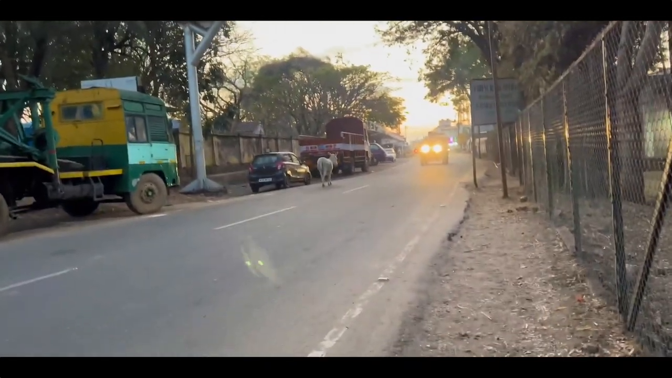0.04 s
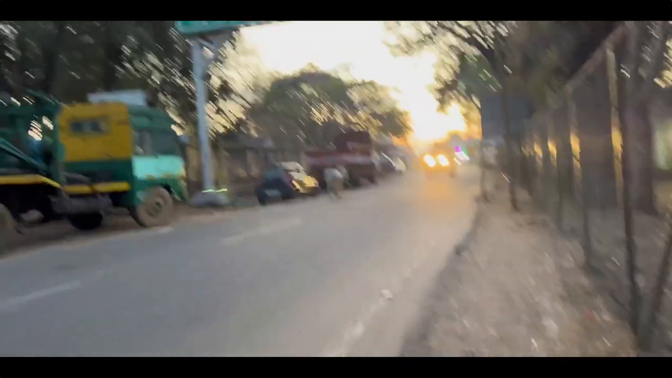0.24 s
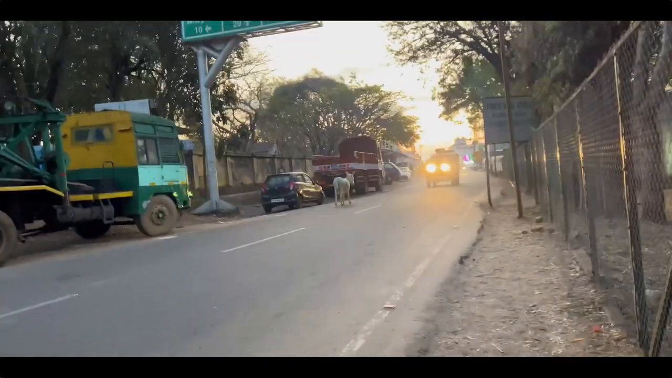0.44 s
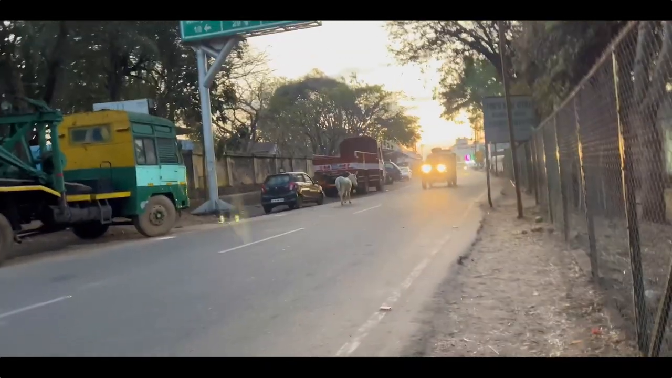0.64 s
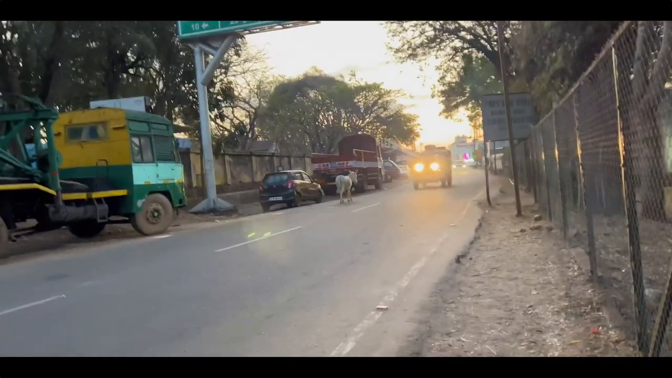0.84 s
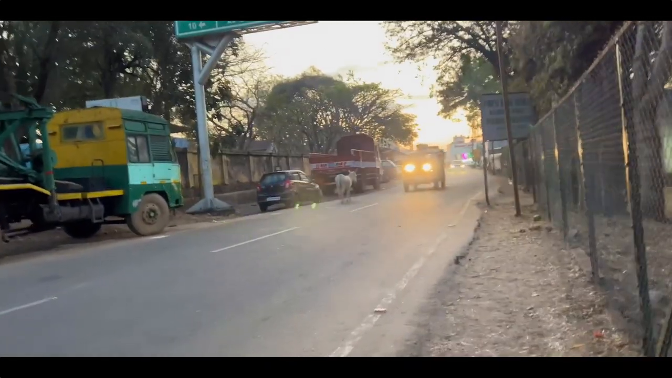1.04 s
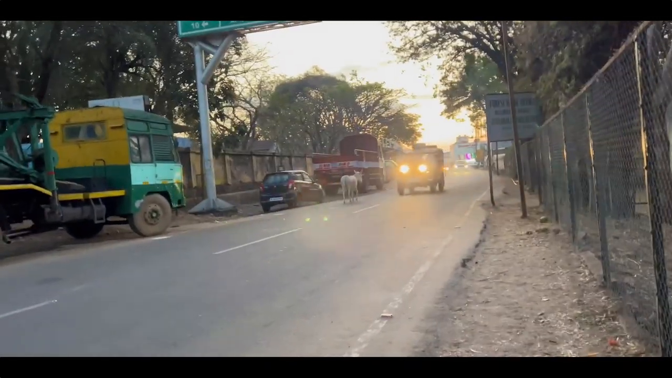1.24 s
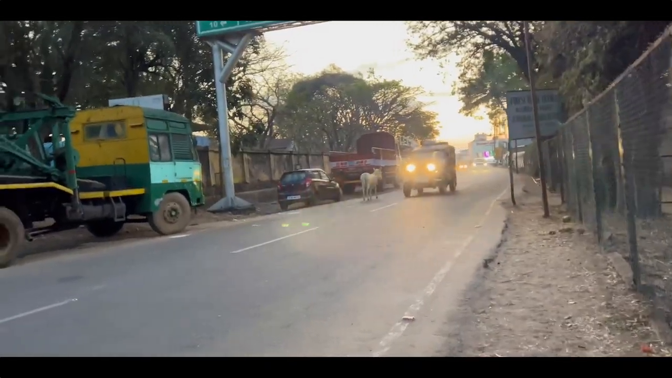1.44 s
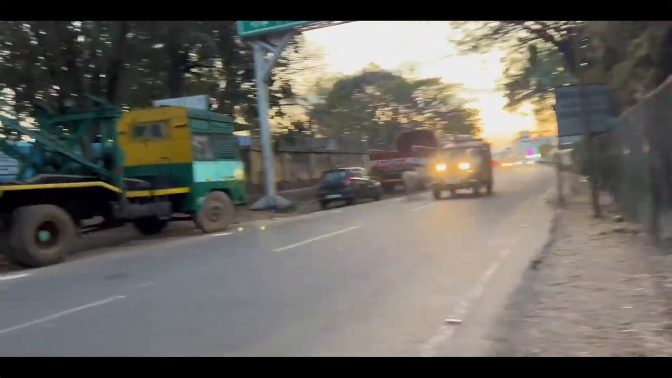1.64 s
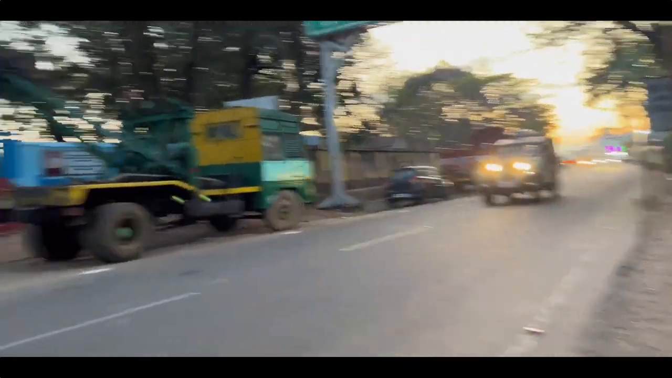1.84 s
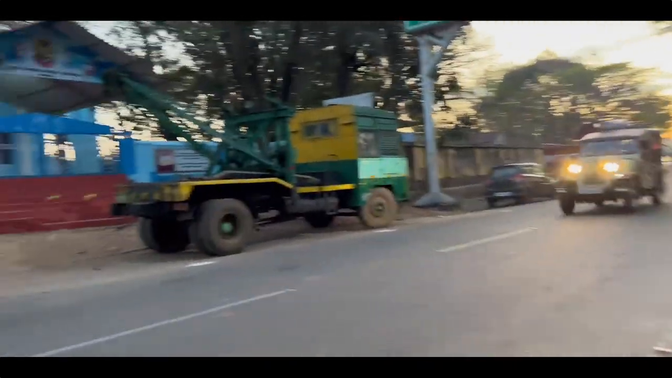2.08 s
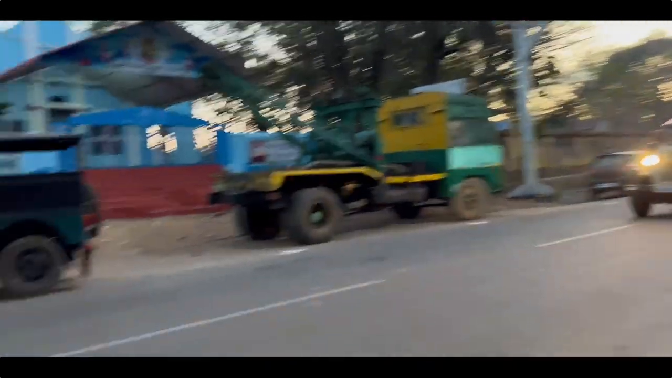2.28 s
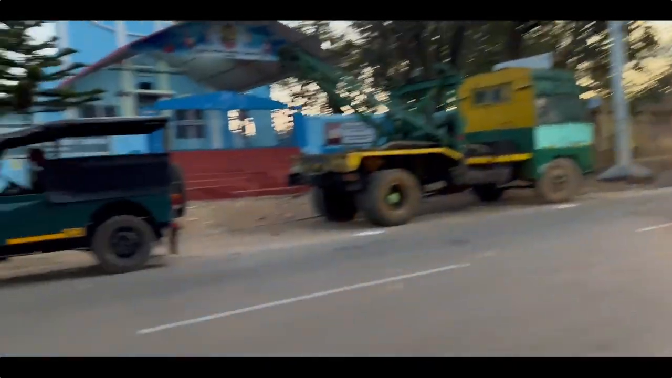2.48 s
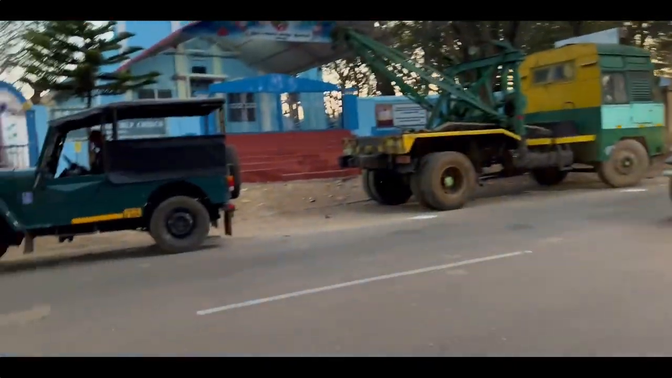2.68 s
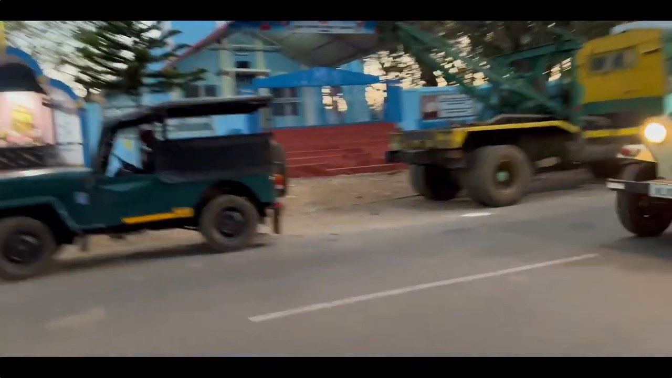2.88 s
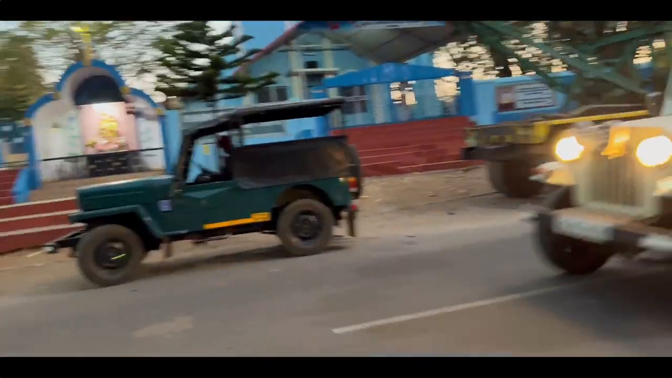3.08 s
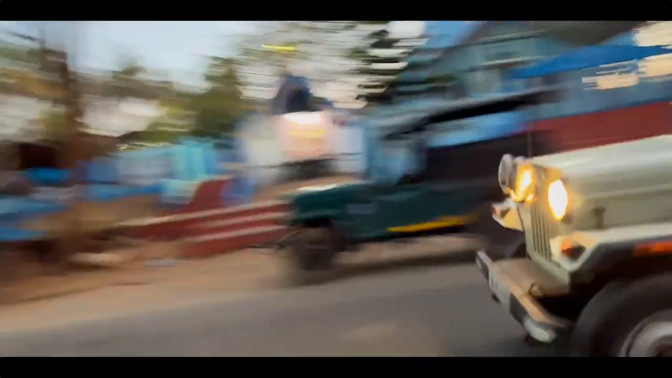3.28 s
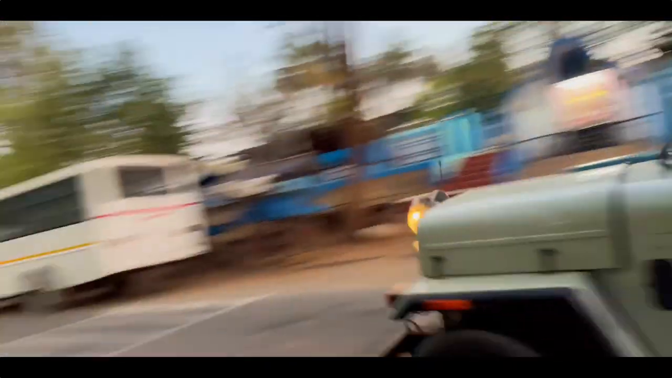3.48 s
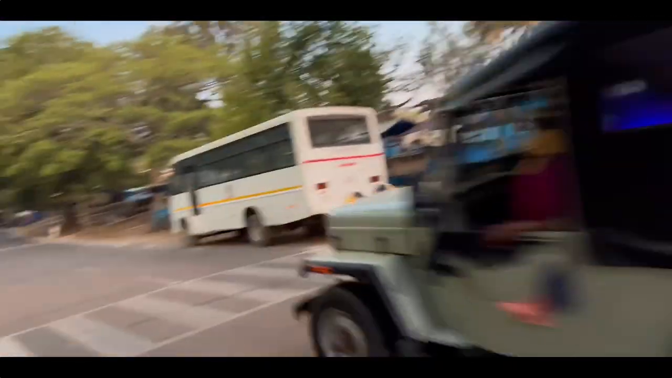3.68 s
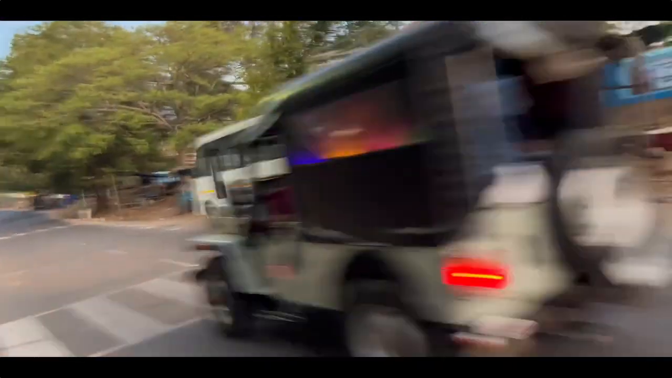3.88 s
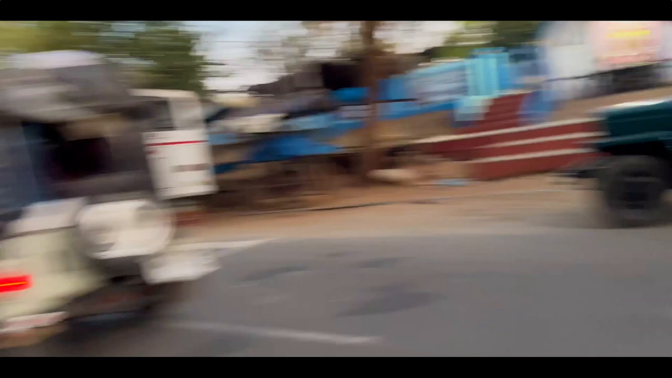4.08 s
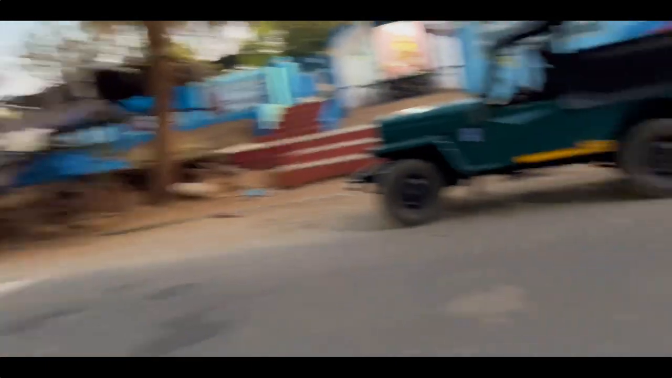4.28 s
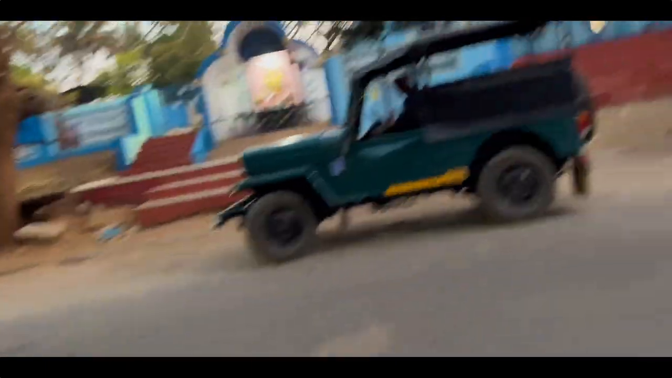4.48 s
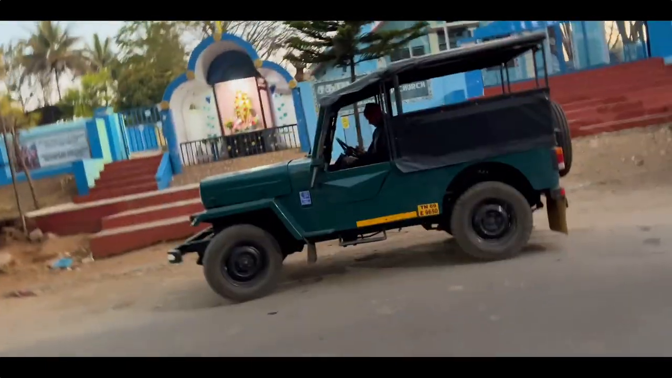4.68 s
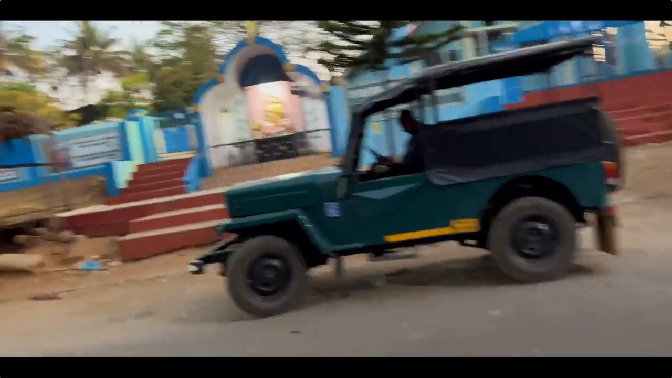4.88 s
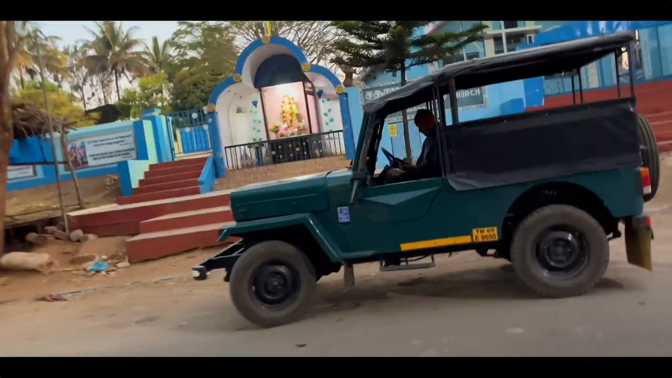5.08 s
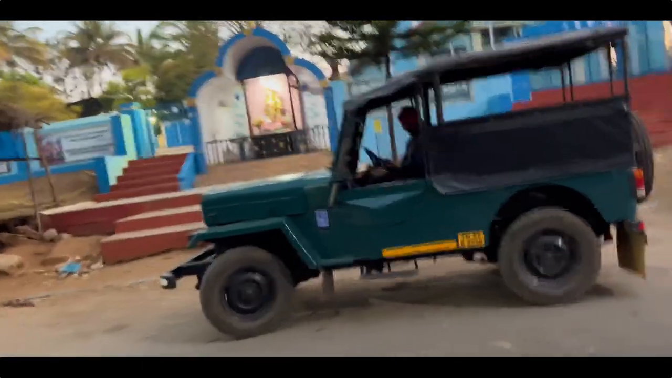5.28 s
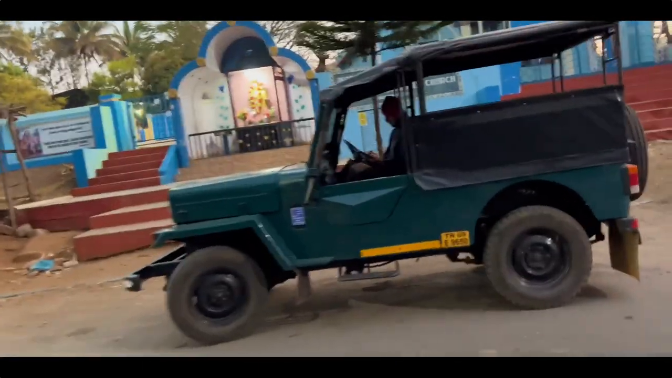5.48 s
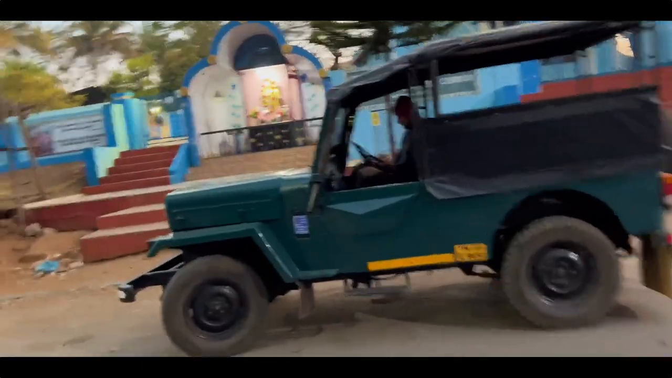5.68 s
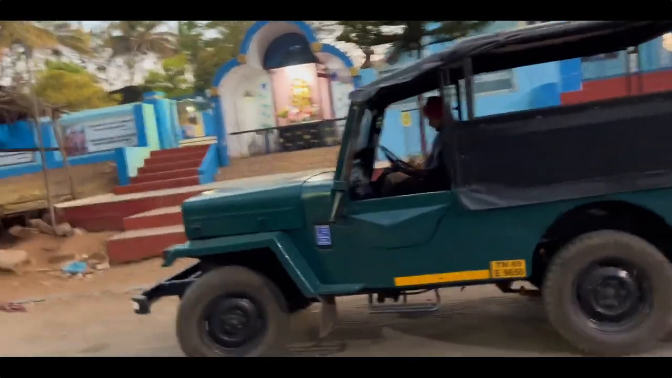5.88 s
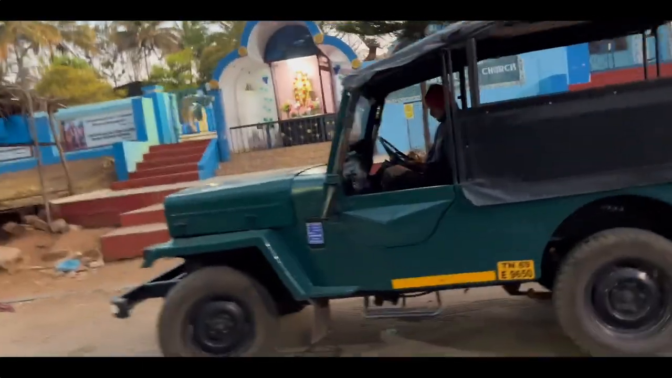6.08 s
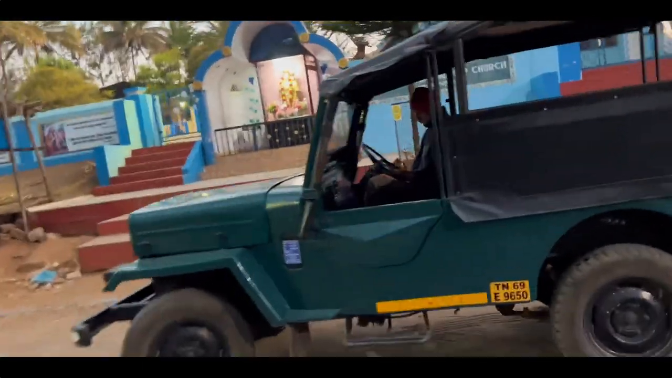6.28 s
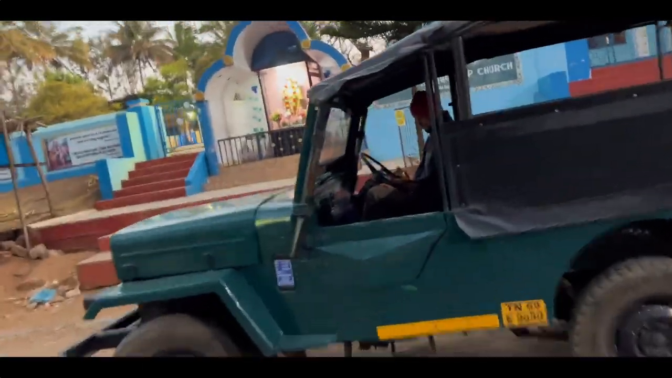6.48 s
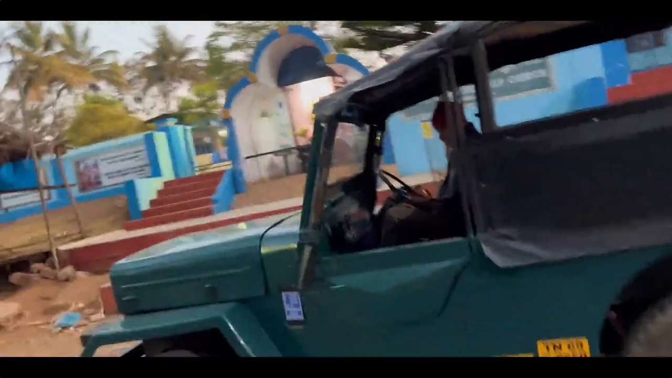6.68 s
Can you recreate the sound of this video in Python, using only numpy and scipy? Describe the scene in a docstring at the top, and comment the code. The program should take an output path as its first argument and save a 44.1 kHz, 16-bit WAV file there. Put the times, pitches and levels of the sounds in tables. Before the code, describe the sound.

Old diesel off-roader drives up, lifts off, sweeps by very near and recedes; its wake thumps the microphone, then a faint distant horn blips.

```python
"""A four-cylinder diesel off-roader comes up a village road, lifts off the throttle, passes close and drives away.
Its wake then buffets the microphone of a phone; a two-tone horn blips far down the road over a low traffic hum."""
import sys
import numpy as np
from scipy import signal
from scipy.fft import rfft, irfft, next_fast_len
from scipy.io import wavfile
from scipy.ndimage import uniform_filter1d, map_coordinates

SR = 44100
rng = np.random.default_rng(int(sys.argv[2]) if len(sys.argv) > 2 else 0)


def put_to_file(sound):
    """Save the sound as 16-bit audio at rate SR, in the file named by the first command-line argument."""
    columns = np.atleast_2d(sound).T  # one column per channel
    safe = np.clip(columns, -1, 1)
    whole_steps = np.round(safe * 32767)
    wavfile.write(sys.argv[1], SR, whole_steps.astype(np.int16))


N = 297227

BAY = [(612, 50, 2.5), (765, 62, -13), (942.7, 28, 1)]  # (Hz, width Hz, dB)
TAIL = [(2800, 260, 1), (4430, 92, -4), (5720, 370, -0.5), (7320, 250, -3)]  # (Hz, width Hz, dB)
# spectra (Hz, dB per Hz)
GROWL = [(60, -17), (130, -4), (200, -3), (300, -2), (420, -8), (600, -14), (900, -56)]
KNOCK = [(300, -4), (480, 4), (700, 4.5), (1100, -2), (1700, -2.5), (2200, -20), (3200, -86)]
CLATTER = [(1400, -20), (2000, 3), (2600, 4), (3300, -1.5), (4300, -12.5), (5200, -15), (7000, -40)]
HISS = [(3000, -17.5), (4300, -5), (5000, -8.5), (6300, -4), (7100, -6.5), (8500, -8), (10000, -13.5), (12000, -27)]
HUM = [(18, -36), (30, -2), (113, 4), (662, -6), (953, -8.5), (1200, -15), (1560, -12.5), (2190, -17), (7060, -23.5),
       (11000, -47), (15000, -84)]
ALIKE = [(300, 1), (500, 0.95), (900, 0.91), (1700, 1), (2800, 0.97), (4200, 0.82), (6000, 0.6), (10000, 0.96), (15000, 0.96)]  # (Hz, left-right likeness)
# pops of the wake: (s, peak dB, top of the spectrum Hz, length s, thump under it dB)
POPS = [(4.696, -7.5, 1800, 0.0045, -12), (4.802, -13, 590, 0.019, 4.5), (4.822, -13.5, 700, 0.016, -17), (4.839, -15, 894, 0.01, -24), (4.924, -19, 576, 0.014, -20), (4.959, -20.5, 350, 0.025, 0), (5.166, -19.5, 500, 0.0077, -1), (5.314, -17.5, 1080, 0.0043, -8), (5.342, -33, 350, 0.011, 12), (5.382, -20, 520, 0.0074, -7), (5.461, -29.5, 594, 0.015, 7), (5.84, -32, 892, 0.0042, -15), (5.869, -32, 496, 0.017, -8), (6.113, -23.5, 360, 0.009, -4)]
HORN_HZ = [441, 500]
HORN = [(-35, -42.5), (-36, -38.5), (-40, -41), (-39.5, -46.5), (-53, -51), (-51, -60), (-61, -56), (-59, -62), (-59, -63), (-56.5, -68)]  # overtones: (low horn dB, high horn dB)
STREET = [(0.048, -12), (.095, -12.5), (.13, -15), (0.191, -23)]  # house fronts: (delay s, dB)
TICK = [(5.473, -28.5, 4080)]  # a grain of grit: (s, dB, Hz)
LOWEST_LEAD = 2.6  # fixed: radians by which the bass cut of the microphone turns the first order
TOP_HZ = 15800  # fixed
SIZZLE = [(8000, -40), (10000, -5), (11200, 0), (12500, -12), (14000, -14), (15800, -25)]
GUSTY = [(50, 0.87), (150, 0.68), (400, 0.2), (1200, 0.12)]  # the same for wind on the two ports
LEAD = [(300, 0), (700, -0.0045), (1500, -0.49), (2500, 0.53), (3150, 1), (3700, 0.98), (4600, -0.69), (5400, -1.05), (7100, -1.21), (15500, -1.52)]  # (Hz, radians the left port leads)
INTAKE = [(1240, 160, -2), (1328, 42, 2), (1427, 77, -3), (1576, 81, -3.5), (1770, 170, -5), (1950, 500, -6.5)]  # intake, same columns
# exhaust note: (s, firings a second as heard Hz, level dB of orders 1, 2, 3)
NOTE = [(0, 56, -39, -35, -38), (.08, 55.2, -32.5, -27, -37.5), (.5, 56.07, -22, -22, -36), (.92, 59.54, -21.5, -22, -34),
        (1.08, 58.2, -23, -28.5, -34), (1.4, 61.44, -22, -24.5, -33), (1.9, 62.06, -19, -16.5, -31.5), (2.06, 58.47, -21.5, -21.5, -34.5),
        (2.18, 62.1, -16, -22, -33), (2.6, 60.04, -18.5, -20, -28), (3.0, 58.88, -20, -13.5, -19), (3.43, 56.16, -12.5, -8.5, -21),
        (3.8, 54.43, -15.5, -16.5, -21), (4.3, 52.4, -24.5, -17, -25), (4.6, 51.23, -39, -22, -29.5), (4.9, 49.5, -35, -21, -38),
        (5.25, 48.24, -42, -38, -54), (5.75, 43.9, -60.5, -53, -67), (5.95, 40.4, -63, -52, -57), (6.74, 40.7, -72, -66, -66)]
# one order fades briefly, probably cancelled by its echo from walls and parked trucks; per order (s, depth dB, half width s)
FADES = [[(.58, -8, 0.13), (1.27, -9, .07), (1.62, -5, 0.055), (1.97, -5, 0.041), (2.31, -12, 0.13), (2.84, -3, 0.078)],
         [(.44, -18, 0.082), (1.0, -19, 0.057), (1.09, -2, 0.054), (1.2, -14, 0.034), (1.65, -13, 0.068), (1.99, -8, .03), (2.52, -3.5, .05)],
         [(1.08, -4, 0.067), (1.62, -8, .04), (1.96, -13, .03), (2.55, -7, 0.064), (2.85, -8, 0.066), (4.3, -12, .02)],
         [(.7, -6, 0.13), (1.0, -5, 0.063), (1.68, -14, 0.041), (2.8, -8, 0.071), (4.3, -10, 0.38)]]
LIFT_S, LIFT_TAKES_S = 1.94, .012  # fixed: the driver lifts off the throttle
TURN_S, TURN_TAKES_S = 4.104, 0.1  # the body comes between engine and microphone
GONE_S, GONE_TAKES_S = 6.0, 0.099  # the tail end turns out of view
DIP_AHEAD_HZ, DIP_BEHIND_HZ, DIP_S, DIP_TAKES_S = 471, 814, 3.92, 0.67  # band that the road's mirror image cancels
# gusts of the wake: (s, rumble dB, hold s, dies away dB/s, flutter against the rumble dB, flutter dies dB/s)
GUSTS = [(4.695, -13.5, 0.005, 179, 7.5, 800), (4.794, -11.5, 0.012, 50, -11, 57), (5.149, -20, 0.011, 1000, -9.5, 999.5),
         (5.322, -27.5, 0.084, 96, -18, 78), (5.59, -34.5, 0.05, 300, -18, 303), (5.738, -37.5, 0.0088, 500, -24, 500),
         (5.82, -34.5, 0.084, 60, -12, 150), (6.018, -34, .02, 45, -17, 50), (6.34, -45, 0.021, 58, -24, 60)]
BLIP_S, BLIP_ATTACK_S, BLIP_HOLD_S, BLIP_RELEASE_S = 5.997, .022, 0.044, 0.028
# far off, the tailpipe points this way for a moment and chuffs once a firing
CHUFF_S, CHUFF_DB, CHUFF_RISES, CHUFF_HOLD_S, CHUFF_FALLS = 5.62, -47, 91, 0.19, 73  # s, dB, dB/s, s, dB/s
CLATTER_LAW, HISS_LAW, SIZZLE_LAW = (-25.5, 1.31, 4, -0.1, -13, 0), (-30.5, 1.2, 3.5, 1.5, -2, -4), (-39, 1.8, 4.5, 0.5, -2.5, -4)
GUST_RISES, FLUTTER_RISES, CALM_DB = 385, 1310, -55.5  # dB/s, dB/s; the stir that is left
FOURTH_DB = -6  # order 4 against order 3
# loss with distance from the microphone: (s, dB)
DISTANCE = [(0, -17), (.9, -14), (1.3, -12.5), (1.95, -9.5), (2.25, -8.5), (2.7, -6), (3.05, -2.5), (3.3, -1.5), (3.47, 0),
            (3.76, -3), (4.06, -5.5), (4.6, -9.5), (5.6, -16.5), (6.74, -14)]
# broad noise: (level abreast dB, dB per dB of distance loss, gain under load dB, which builds up dB/s,
# seen from behind dB, further fall dB/s)
GROWL_LAW, KNOCK_LAW = (-22, 0.78, 0.5, 0.5, 1.5, -11.5), (-21.5, 1.2, 5.5, .5, -5.5, -4)
BAY_LAW = (-33.5, .35, 6, 5, -3, -9)  # fixed
INTAKE_LAW = (-30.5, 0.36, 3, 1, 0, 0)
REAR_LATE_S = 0.044  # the rear wheels pass after the engine
TAIL_DB, TAIL_S, TAIL_TAKES_S = 5.5, 4.17, .15  # over the clatter; the tail end swings into view
MIRROR_LOST = 0.64  # share of the mirror image that the body hides once the car is past


def amp(db):
    """dB to gain."""
    return 10 ** (np.asarray(db) / 20)


def unit(x):
    """x at rms 1."""
    return x / np.sqrt(np.mean(x ** 2) + 1e-20)


def along(points, hz):
    """(Hz, value) points on a log axis."""
    f, v = np.transpose(points)
    return np.interp(np.log(hz + 1), np.log(f + 1), v)


def curves(rows):
    """One value per sample for each column after the time."""
    s, *cols = np.transpose(rows)
    return [np.interp(np.arange(N) / SR, s, c) for c in cols]


def wobble(rate):
    """A smooth random curve, rate knots a second."""
    return map_coordinates(rng.standard_normal(int(N * rate / SR) + 4), [np.arange(N) * rate / SR])


def filtered(x, response):
    """x times a response of frequency."""
    m = next_fast_len(N + 8192)
    return irfft(rfft(x, m) * response(np.fft.rfftfreq(m, 1 / SR)), m)[..., :N]


def rush(gain, throb=1, alike=ALIKE, patchy_db=1.5):
    """Stereo noise of rms 1 with patches of random gain, pulsed by throb, then coloured by gain(Hz)."""
    turn = lambda hz: np.arccos(np.clip(along(alike, hz), -1, 1)) / 2
    z = signal.stft(rng.standard_normal((2, N)), nperseg=512)[2]
    field = uniform_filter1d(uniform_filter1d(rng.standard_normal(z.shape[1:]), size=4, axis=0), size=8, axis=1)
    pair = signal.istft(z * amp(patchy_db * unit(field)), nperseg=512)[1][:, :N] * throb
    mid, side = filtered(pair, lambda hz: gain(hz) * [np.cos(turn(hz)), np.sin(turn(hz))])
    return unit(np.array([mid + side, mid - side]))


def shape(points):
    """Gain of a (Hz, dB) spectrum."""
    return lambda hz: amp(along(points, hz))


def resonances(modes):
    """Gain of (Hz, width, dB) peaks, applied twice for dark valleys."""
    return lambda f: np.sqrt(sum((amp(db) * f * w) ** 2 / ((c * c - f * f) ** 2 + (f * w) ** 2) for c, w, db in modes)) ** 2


def car():
    """The low orders of the firing rate are clean tones; above them each firing lets out a puff of noise."""
    firing_hz, *plain_db = curves(NOTE)
    t = np.arange(N) / SR
    order_db = [db + sum(depth * np.exp(-((t - s) / width) ** 2) for s, depth, width in fades)
                for db, fades in zip(plain_db + [plain_db[2] + FOURTH_DB], FADES)]
    turn = 2 * np.pi * np.cumsum(firing_hz) / SR
    note = sum(np.sqrt(2) * amp(db + 0.65 * wobble(15)) * np.cos((k + 1) * turn + 0.084 * (k + 1) * wobble(9.2) + (k == 0) * LOWEST_LEAD)
               for k, db in enumerate(order_db))
    growl_db, knock_db, clatter_db = [
        passing_db(*law) for law in (GROWL_LAW, KNOCK_LAW, CLATTER_LAW)]
    hiss_db, sizzle_db = [passing_db(*law, late=REAR_LATE_S) for law in (HISS_LAW, SIZZLE_LAW)]
    loaded = amp(passing_db(*INTAKE_LAW)) * (1 - step(LIFT_S, LIFT_TAKES_S))
    bay = amp(passing_db(*BAY_LAW) - knock_db)
    tail = amp(TAIL_DB) * step(TAIL_S, TAIL_TAKES_S) * (1 - step(GONE_S, GONE_TAKES_S))
    # the four cylinders are not equally strong, and no two firings are alike
    firing = (turn / (2 * np.pi)).astype(int)
    size = amp(np.array([4.4, -1.0, 5.5, -1.5])[firing % 4] + 2.0 * rng.standard_normal(firing[-1] + 1)[firing])
    puff = size * np.exp(0.52 * np.cos(turn))
    throb = 1 + 0.24 * unit(puff)
    level = throb / np.sqrt(uniform_filter1d(throb ** 2, size=SR // 8))
    shake = 0.15 * wobble(9)
    # alternate cylinders exhaust unequally: weak lines half way between the orders
    halves = sum(amp(6.0 * wobble(4.7) - 1.7 * k) * np.sin(k / 2 * turn + 0.95 * wobble(6)) for k in range(5, 15))
    growl = amp(growl_db + shake + 0.16 * wobble(6.8)) * (rush(shape(GROWL), level) + amp(-7.0) * unit(halves))
    knock = amp(knock_db + shake) * (rush(shape(KNOCK), level) + bay * rush(resonances(BAY), level) + amp(-12.0) * (rattles(count=3000) + np.array([[.35], [-.35]]) * rattles(count=2000)))
    # the intake is blown once a firing, so its ring is part tone, part noise
    blown = unit(filtered(size * np.diff(firing, prepend=0), resonances(INTAKE)))
    intake = loaded * (steady(rush(resonances(INTAKE), level, patchy_db=0.5), .04) + 0.3 * blown)  # fixed
    clatter = amp(clatter_db + shake) * (rush(shape(CLATTER), level) + amp(-6.5) * rattles(count=500) + tail * rush(resonances(TAIL), level))
    hiss = amp(hiss_db + shake) * rush(shape(HISS), level)
    sizzle = amp(sizzle_db + shake + 1.5 * wobble(6)) * rush(shape(SIZZLE), level)  # fixed
    chuff = amp(swell_db(CHUFF_S, CHUFF_DB, CHUFF_RISES, CHUFF_HOLD_S, CHUFF_FALLS)) * rush(shape([(2500, -30), (4200, -3), (6000, 0.5), (8500, -3.5), (11000, -11.0), (15000, -32)]), 0.13 + np.sqrt(size) * np.exp(0.52 * np.cos(turn)))
    return note + mirrored(growl + knock, share=0.41) + intake + clatter + hiss + sizzle + chuff


def wake():
    """Eddies roll over the microphone: lumpy rumble, a flutter on top, and single pops."""
    gusts = np.array([amp(swell_db(s, db, GUST_RISES, hold, dies)) for s, db, hold, dies, *_ in GUSTS])
    flaps = np.array([amp(swell_db(s, db + over_db, FLUTTER_RISES, hold, dies)) for s, db, hold, _, over_db, dies in GUSTS])
    stir = amp(CALM_DB) * step(GUSTS[0][0], .02)
    rolling = np.sqrt(np.sum(gusts ** 2, 0)) + stir
    flapping = np.sqrt(np.sum(flaps ** 2, 0)) + stir
    lumps = amp(2.0 * wobble(35))  # fixed
    rumble = rush(shape([(25, -39), (45, -4.5), (70, 6), (110, 1), (170, -3), (260, -27), (500, -76)]), 1, GUSTY)
    flutter = rush(shape([(120, -29), (220, 6.5), (400, 2.5), (750, -5.5), (1300, -47), (3000, -74)]), lumps, GUSTY)
    out = rolling * steady(rumble, 0.052) + flapping * flutter
    t = np.arange(-SR // 10, SR // 10) / SR
    for s, db, top_hz, length, thump_db in POPS:
        gust = rng.standard_normal(len(t)) + np.array([[.7], [-.7]]) * rng.standard_normal(len(t))
        sos = signal.butter(3, [190, top_hz], "bandpass", fs=SR, output="sos")  # fixed
        pop = steady(unit(signal.sosfilt(sos, signal.lfilter([1], [1, -.96], gust))), 0.0066)
        low = signal.butter(2, [55, 170], "bandpass", fs=SR, output="sos")  # fixed
        pop = pop + amp(thump_db) * steady(unit(signal.sosfilt(low, gust)), 0.012)
        # pressure builds fast and collapses more slowly
        swell = np.where(t < 0, np.exp(-(t / length * 2.15) ** 2), np.exp(-np.abs(t) / length * 1.96))
        out[:, round(s * SR) - SR // 10:][:, :len(t)] += amp(db) * pop * swell
    return out


def horn():
    """Two buzzing diaphragms a tone apart that sag as the current is cut, repeated by the house fronts."""
    since = np.arange(N) / SR - BLIP_S
    on = np.minimum(since / BLIP_ATTACK_S, 1 - (since - BLIP_ATTACK_S - BLIP_HOLD_S) / BLIP_RELEASE_S)
    blip_db = 20 * np.log10(np.clip(on, 0, 1) ** 1.4 + 1e-9)
    t = np.cumsum(1 + .0006 * np.clip(blip_db, -30, 0)) / SR
    tone = sum(np.sqrt(2) * amp(db + 3.8 * wobble(50)) * np.sin(2 * np.pi * (k + 1) * hz * t + .5 * wobble(30) + k * k)
               for k, pair in enumerate(HORN) for hz, db in zip(HORN_HZ, pair))
    blip = tone * amp(blip_db)
    fronts = sum(amp(db) * np.roll(blip, round(s * SR)) for s, db in STREET)
    tail = rng.standard_normal((2, SR // 2)) * amp(-60 * np.arange(SR // 2) / SR / 0.5)  # fixed
    wash = signal.fftconvolve(blip[None], tail / np.linalg.norm(tail[0]), axes=1)[:, :N]
    return blip + fronts + amp(-12) * np.roll(wash, SR // 25, axis=1)  # fixed


def grit():
    """A dry tick with a short ring."""
    out, t = np.zeros(N), np.arange(SR // 50) / SR
    for s, db, hz in TICK:
        crack = signal.lfilter([1, 0, -1], [1, -1.1, .55], rng.standard_normal(len(t))) * amp(-60 * t / .007 - 8)  # fixed
        out[round(s * SR):][:len(t)] += amp(db) * (np.sin(2 * np.pi * hz * t) * amp(-60 * t / 0.01) + crack)
    return out


def steady(x, seconds):
    """x with its level evened out over the given time."""
    return x / np.sqrt(np.abs(uniform_filter1d(uniform_filter1d(np.mean(x ** 2, 0), round(seconds * SR)), round(seconds * SR))) + 0.028)


def mirrored(x, share):
    """x plus its dull reflection from the road, half a period of the dip late."""
    dip_hz = DIP_AHEAD_HZ + (DIP_BEHIND_HZ - DIP_AHEAD_HZ) * step(DIP_S, DIP_TAKES_S)
    at = np.arange(N) - SR / 2 / dip_hz
    late = np.array([np.interp(at, np.arange(N), channel) for channel in x])
    seen = share * (1 - MIRROR_LOST * step(TAIL_S, TAIL_TAKES_S))
    return x + seen * filtered(late, lambda hz: 1 / (1 + (hz / 1100) ** 4))


def rattles(count):
    """Loose panels and valve gear: short rings at random pitches and sizes."""
    when, pitch, size = rng.random((count, 3)).T
    hz, t = 600 * 6 ** pitch, np.arange(SR // 40) / SR
    rings = amp(9.0 * size ** 3)[:, None] * np.sin(2 * np.pi * hz[:, None] * t) * np.exp(-t * hz[:, None] / 9) * (1 - np.exp(-t / 0.0034))
    at = (when * N).astype(int)[:, None] + np.arange(len(t))
    return unit(np.bincount(at.ravel(), rings.ravel())[:N])


def step(s, takes):
    """A smooth rise from 0 to 1 around time s."""
    return .5 + .5 * np.tanh((np.arange(N) / SR - s) / takes)


def swell_db(s, db, rises, hold, falls):
    """Level that climbs to db at time s, holds, then falls; slopes in dB/s."""
    t = np.arange(N) / SR - s
    return db + rises * np.minimum(t, 0) - falls * np.maximum(t - hold, 0)




def passing_db(db, grows, load_db, builds, behind_db, falls, late=0):
    """Level of one layer: distance, throttle, and the body in the way once the car is past."""
    t = np.arange(N) / SR
    load = (load_db - builds * (LIFT_S - t)) * (1 - step(LIFT_S, LIFT_TAKES_S))
    return (db + grows * np.interp(t - late, *np.transpose(DISTANCE)) + load + behind_db * step(TURN_S, TURN_TAKES_S)
            + falls * np.maximum(t - TURN_S, 0))


def scene():
    """Airborne sound through the two ports, wind directly on them."""
    hum = amp(-43.5 + 5.0 * wobble(2.875)) * rush(shape(HUM))
    air = car() + horn() + grit() + hum
    # the two ports sit apart on the phone's body, so the treble reaches them out of step
    ports = filtered(air, lambda hz: np.exp(.5j * along(LEAD, hz) * np.array([[1], [-1]])))
    return ports + wake()


def record(dry):
    """The phone softly clips its peaks and keeps nothing above its band limit."""
    soft = dry / (1 + np.abs(dry / .95) ** 6) ** (1 / 6)  # fixed
    return filtered(soft, lambda hz: hz < TOP_HZ)


dry = scene()
out = record(dry)
put_to_file(out)
```